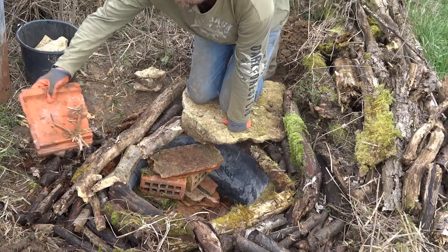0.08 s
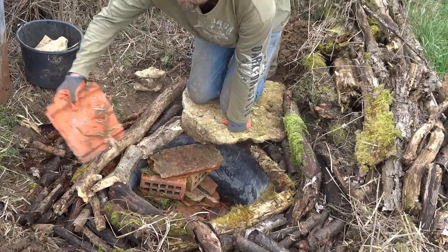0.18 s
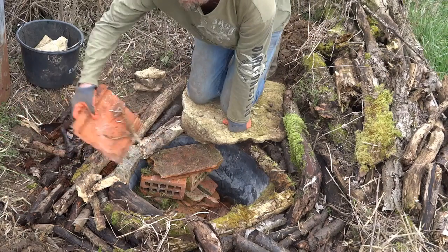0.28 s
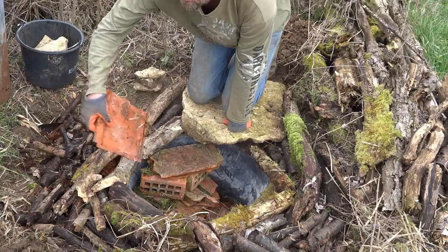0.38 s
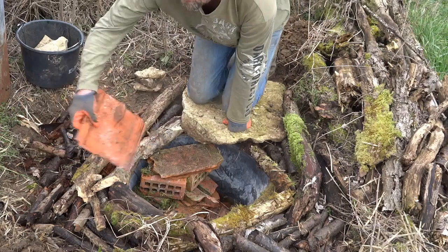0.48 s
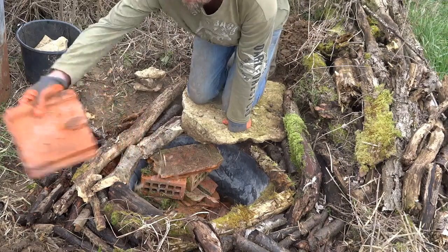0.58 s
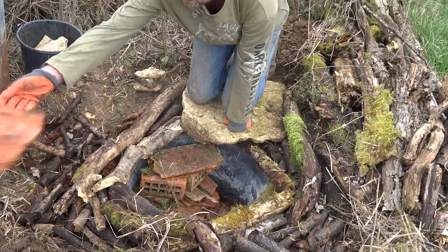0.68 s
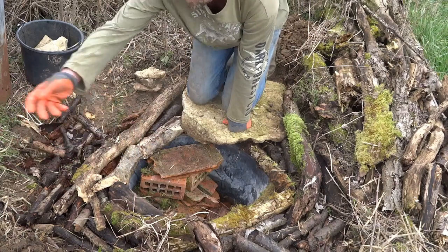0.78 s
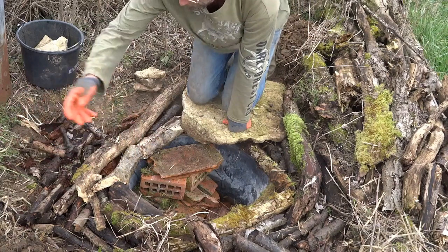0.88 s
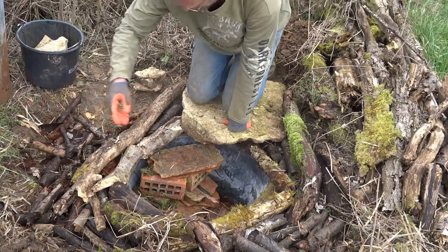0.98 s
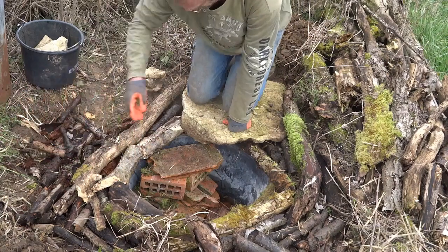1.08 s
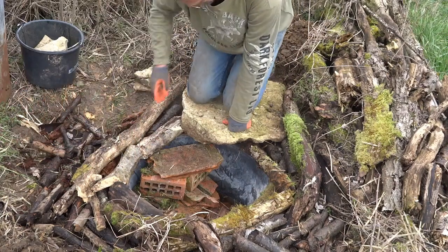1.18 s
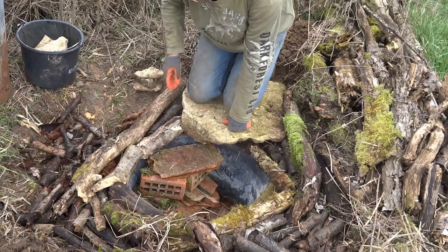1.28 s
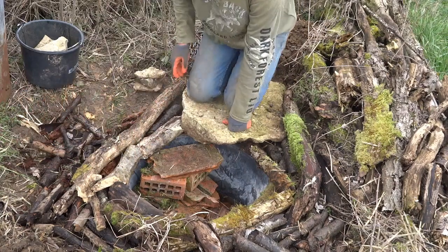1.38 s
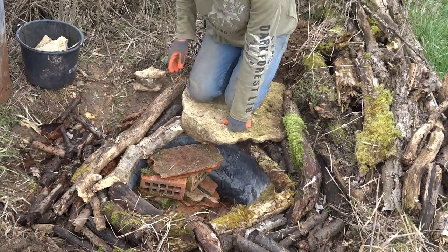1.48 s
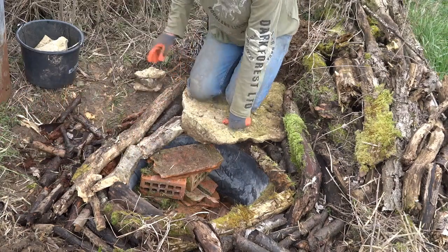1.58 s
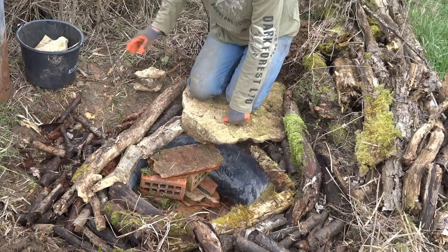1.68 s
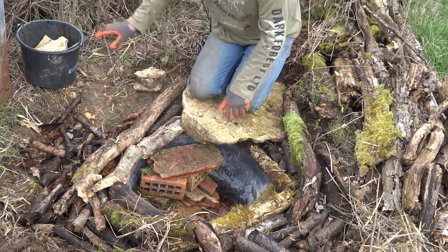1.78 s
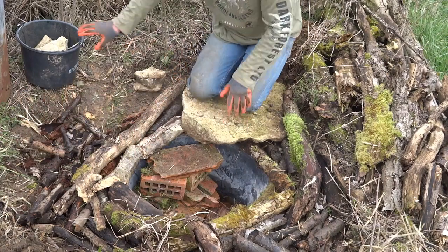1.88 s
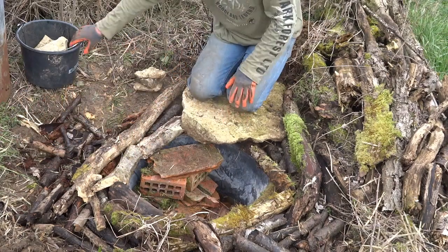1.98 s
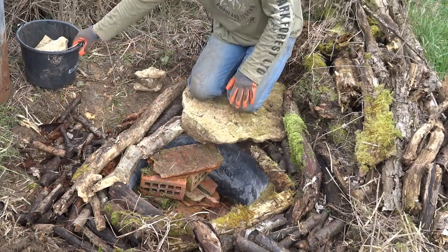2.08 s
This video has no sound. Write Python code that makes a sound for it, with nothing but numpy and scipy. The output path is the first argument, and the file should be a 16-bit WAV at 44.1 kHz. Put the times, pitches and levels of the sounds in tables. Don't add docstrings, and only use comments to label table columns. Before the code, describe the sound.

Clay tile knocks sharply on rubble, then cloth rustle and one smaller shard clink in a garden

```python
import sys
import numpy as np
from scipy import signal
from scipy.fft import rfft, irfft
from scipy.io import wavfile
from scipy.ndimage import uniform_filter1d

SR = 44100
rng = np.random.default_rng(int(sys.argv[2]) if len(sys.argv) > 2 else 0)


def ratio(d):
    e = np.asarray(d, float) / 20
    return 10 ** e


def wrap_up_sound(samples):
    columns = np.atleast_2d(samples).T
    tamed = np.clip(columns, -1, 1)
    steps = np.round(tamed * 32767).astype(np.int16)
    wavfile.write(sys.argv[1], SR, steps)


N = 92610
T = np.arange(N) / SR

# start in seconds, peak in dB, favoured frequency in Hz.
TILE_KNOCKS = [(.205, -39.5, 910), (.215, -37.5, 1100), (.222, -31, 1020), (.229, -36, 900),
               (.2355, -11, 1190), (.241, -12.5, 1900), (.2445, -8, 1100), (.2495, -17, 1270),
               (.253, -17, 1100), (.262, -11.5, 1180), (.272, -13, 1500), (.278, -16.5, 1050),
               (.286, -15, 1500), (.291, -19.5, 1420), (.297, -19, 990), (.307, -26, 800),
               (.3175, -17, 1250), (.322, -12.5, 1720), (.3262, -17, 864), (.334, -20.5, 1000),
               (.339, -15.5, 1260), (.351, -25.5, 1500), (.3665, -20, 960), (.375, -27, 780),
               (.386, -29, 1910), (.3935, -19, 850), (.400, -31, 670), (.407, -29, 910), (.412, -25.5, 680)]
# frequency in Hz, level in dB, t60 in seconds.
TILE_MODES = [(324.5, -0.5, 0.16), (587, -1, .07), (718, -12.5, 0.11), (846, -6, .05), (932, -1.5, 0.058),
              (1100, 2.5, 0.02), (1280.5, -5.5, 0.066), (1411, -4, 0.037), (1780, -6, .04),
              (2320, -5, 0.031), (2620, -10, 0.012), (3050, -13.5, 0.037), (3870, -16, .025)]
# frequency in Hz, density in dB per Hz.
TILE_GRIT = [(150, -24), (350, -6.5), (950, -10.5), (2800, -14), (3700, -28), (6000, -47.5)]
# start in seconds, peak in dB, favoured frequency in Hz.
SHARD_KNOCKS = [
    (1.058, -35.5, 520),
    (1.0635, -28, 3050),
    (1.0695, -18.5, 1560),
    (1.073, -15.5, 1290),
    (1.079, -21, 1260),
    (1.0845, -23.5, 760),
    (1.086, -33.5, 2700),
    (1.166, -52, 760),
    (1.19, -43, 1300),
]
# frequency in Hz, level in dB, t60 in seconds.
SHARD_MODES = [(322, -8.5, 0.064), (550, -8.5, 0.032), (759, -7, 0.096), (916, -4, .035), (1261, 3, 0.042),
               (1500, -7, 0.027), (1794, -7.5, 0.034), (2020, -1.5, 0.027), (757, -21.5, 0.33),
               (2700, -7.5, 0.054), (3030, -7, 0.048)]
# frequency in Hz, density in dB per Hz.
SHARD_GRIT = [(200, -23), (1270, 4), (3000, -19), (3600, -9), (7500, -37.5), (11000, -10.5)]
# start in seconds, peak in dB, centre in Hz, t60 in seconds.
TICKS = [(.071, -40.5, 935, .03), (.088, -46.5, 560, 0.037), (0.805, -48, 3270, 0.09),
         (.829, -48, 8400, 0.019), (0.249, -27.5, 6400, .012), (.271, -34, 5840, 0.0086),
         (0.291, -36, 5840, 0.0073), (.38, -45, 6200, 0.023), (1.08, -27.5, 10400, 0.004),
         (1.084, -47, 10800, 0.01), (1.08, -54, 4300, 0.02), (1.4615, -43.5, 560, 0.039),
         (2.022, -49, 2640, 0.31), (1.472, -37, 280, 0.02), (1.608, -49.5, 10550, .03),
         (1.7215, -37.5, 3220, .012), (1.7215, -37, 10100, 0.028), (1.7218, -40.5, 2270, 0.011),
         (1.7215, -46.5, 6740, 0.036), (1.778, -50, 2380, 0.18), (2.0975, -39.5, 500, 0.077),
         (2.086, -53, 950, 0.018)]
# start in seconds, length in seconds, first Hz, last Hz, level in dB.
BIRD_NOTES = [
    (.008, 0.0062, 3540, 4430, -47.5),
    (.013, 0.0088, 4330, 4310, -44),
    (0.024, 0.015, 3140, 3400, -46),
    (.04, .021, 3410, 4350, -57.5),
    (.058, 0.018, 4370, 4800, -51.5),
    (0.0752, .005, 4500, 3100, -47.5),
    (0.079, .018, 4930, 2840, -51.5),
    (.082, 0.011, 3780, 3820, -51.5),
    (1.84, 0.099, 4180, 4105, -73),
    (1.559, 0.035, 6360, 6350, -75),
]
# time in seconds, level in dB.
DOVE_LEVEL = [(.72, -69), (.85, -59), (1.0, -62), (1.3, -67), (1.42, -79)]
# time in seconds, level in dB.
RUSTLES = [
    [(.66, -65.5), (.704, -51), (.71, -41), (.757, -43.5), (.775, -57), (.8, -57), (.93, -67.5), (1.0, -73)],
    [(1.445, -89), (1.46, -57.5), (1.51, -65)],
    [(2.0, -72), (2.04, -60), (2.1, -58.5)],
]
# frequency in Hz, density in dB per Hz.
CLOTH_SPECTRUM = [(500, -19.5), (950, -5.5), (1300, -3.5), (2100, -6.5), (3000, -11.5), (5000, -24)]
# time in seconds, level in dB.
DUST_LEVEL = [(.195, -62), (.23, -41.5), (.25, -35), (.268, -53.5), (.415, -49.5), (.418, -67.5),
              (.65, -76), (.7, -51.5), (.76, -53), (.785, -70), (1.055, -71), (1.075, -46), (1.1, -58.5),
              (1.2, -72), (1.25, -69.5), (2.0, -72), (2.035, -61.5)]
# frequency in Hz, density in dB per Hz.
DUST_SPECTRUM = [(1800, -15.5), (3200, -2), (5000, -5.5), (6300, 2), (7800, -5.5), (10300, -2)]
# frequency in Hz, density in dB per Hz.
AIR_SPECTRUM = [(40, -40.5), (200, -27.5), (400, -8.5), (1350, -6), (3200, -9), (5000, -19.5),
                (6300, -17.5), (8000, -19.5), (11000, -21)]
# frequency in Hz, left-right correlation.
AIR_LIKENESS = [(60, 1), (830, 0.48), (11600, 0.93)]
# time in seconds, gain in dB.
AIR_SWELL = [(.41, 8.5), (.45, 0), (.7, 2.5), (.95, 3.5), (1.2, 3), (1.4, 0.5), (1.8, 2)]
# time in seconds, left over right in dB.
HANDS_PAN = [(.415, -3), (.43, 0.5), (1.0, 2), (1.06, 5), (1.3, 1)]


def evened(x):
    return x / np.sqrt(np.mean(x ** 2) + 1e-20)


def read(points, hz):
    f, value = np.transpose(points)
    return np.interp(np.log(hz + 1), np.log(f + 1), value)


def colour(x, points):
    gain = ratio(read(points, np.fft.rfftfreq(len(x), 1 / SR)))
    return evened(irfft(rfft(x) * gain, len(x)))


def envelope(rows, **ends):
    return ratio(np.interp(T, *np.transpose(rows), **ends))


def add(mix, start_s, sound):
    part = mix[..., round(start_s * SR):][..., :len(sound)]
    part += sound[:part.shape[-1]]


def sides(x, pan_db):
    return x * ratio(np.array([[.5], [-.5]]) * pan_db)


def widened(mid, side):
    return mid + np.array([[1], [-1]]) * side


def band(x, hz, width_hz):
    b, a = signal.iirpeak(min(hz, 20000), max(hz / width_hz, .3), SR)
    return signal.lfilter(b, a, x)


def low_cut(x):
    return signal.sosfilt(signal.butter(3, 161, "high", fs=SR, output="sos"), x)


def knocks(rows, modes, grit, grit_db, grit_t60_s):
    rise_s, spread_db, focus_db, detune = 0.00094, 2.2, 4.5, 0.0058
    out, t = np.zeros(N), np.arange(8192) / SR
    hz, db, t60_s = np.transpose(modes)[:, :, None]
    for start_s, peak_db, near_hz in rows:
        phase, level, pitch = rng.standard_normal((3, 14, 1))[:, :len(modes)]
        crunch = colour(rng.standard_normal(len(t)), grit)
        focus = focus_db * np.log2(hz / near_hz) ** 2
        size = ratio(db + spread_db * level - focus - 60 * t / t60_s)
        ring = (size * np.sin(2 * np.pi * hz * (1 + detune * pitch) * t + 2 * phase)).sum(0)
        hit = ring / abs(ring).max() + crunch * ratio(grit_db - 60 * t / grit_t60_s)
        add(out, start_s, ratio(peak_db) * np.minimum(t / rise_s, 1) * hit)
    return out


def tile():
    return low_cut(knocks(TILE_KNOCKS, TILE_MODES, TILE_GRIT, grit_db=-11, grit_t60_s=.04))


def shard():
    return low_cut(knocks(SHARD_KNOCKS, SHARD_MODES, SHARD_GRIT, grit_db=-12, grit_t60_s=0.051))


def ticks():
    out, t = np.zeros(N), np.arange(4096) / SR
    for start_s, peak_db, hz, t60_s in TICKS:
        width_hz = 246 + 0.28 * hz
        puff = rng.standard_normal(len(t)) * ratio(-60 * t / t60_s)
        puff = band(band(puff, hz, width_hz), hz, width_hz)
        add(out, start_s, ratio(peak_db) * puff / abs(puff).max())
    return low_cut(out)


def rustle():
    grains_per_s, grain_db, grain_cycles, pitches = 6000, 2.2, 12, 24
    size = ratio(grain_db * np.minimum(rng.exponential(1, N), 4))
    size = size * (rng.random(N) < grains_per_s / SR)
    kind, near = rng.integers(0, pitches, N), np.zeros(N)
    for k, hz in enumerate(np.geomspace(350, 5000, pitches)):
        cycle = np.arange(0, grain_cycles, hz / SR)
        grain = np.sin(np.pi * cycle / grain_cycles) ** 2 * np.sin(2 * np.pi * cycle)
        grain = grain * hz * ratio(read(CLOTH_SPECTRUM, hz))
        near += signal.oaconvolve(size * (kind == k), grain)[:N]
    near = evened(near) * sum(envelope(rows, left=-120, right=-120) for rows in RUSTLES)
    return widened(near, 0.16 * np.roll(near, 9))


def dust():
    mid, side = (colour(noise, DUST_SPECTRUM) for noise in rng.standard_normal((2, N)))
    return widened(mid, 0.56 * side) * envelope(DUST_LEVEL, left=-120)


def birds():
    pan_db, echo_db, echo_t60_s = 1, -7, 0.22
    out = np.zeros(N)
    for start_s, length_s, from_hz, to_hz, db in BIRD_NOTES:
        u = np.arange(0, length_s, 1 / SR) / length_s
        cycles = np.cumsum(from_hz + (to_hz - from_hz) * u) / SR
        add(out, start_s, ratio(db + 4) * np.sin(np.pi * u) ** 0.35 * np.sin(2 * np.pi * cycles))
    tail = rng.standard_normal((2, 16384)) * ratio(-60 * T[:16384] / echo_t60_s)
    echo = signal.fftconvolve(out[None], tail / np.linalg.norm(tail[0]), axes=1)[:, :N]
    return sides(out, pan_db) + ratio(echo_db) * echo


def dove():
    tone = rng.standard_normal(N)
    for _ in range(4):
        tone = band(tone, hz=353, width_hz=144)
    return evened(tone) * envelope(DOVE_LEVEL, left=-120, right=-120)


def air():
    air_db, patch_db = -63, 2.0
    frames, hz = N // 128 + 5, np.fft.rfftfreq(512, 1 / SR)
    a, b, c, d, patches = rng.standard_normal((frames, 257, 5)).T
    patches = evened(uniform_filter1d(uniform_filter1d(patches, 5, 0), 16, 1))
    same = np.clip(read(AIR_LIKENESS, hz), -1, 1)[:, None]
    left = a + 1j * b
    right = same * left + np.sqrt(1 - same ** 2) * (c + 1j * d)
    z = np.array([left, right]) * ratio(read(AIR_SPECTRUM, hz)[:, None] + patch_db * patches)
    noise = signal.istft(z, nperseg=512, noverlap=384)[1][:, :N]
    return evened(noise) * ratio(air_db) * envelope(AIR_SWELL)


def scene():
    cut_s, cut_db, fade_s = .4156, -24.5, 0.022
    pan_db = np.interp(T, *np.transpose(HANDS_PAN))
    mic = signal.firwin(255, 11020, window=("kaiser", 7), fs=SR)
    fade = ratio(cut_db) * np.clip(1 - (T - cut_s) / fade_s, 0, 1)
    cut = np.where(T < cut_s, 1, fade)
    clatter = cut * signal.oaconvolve(tile(), mic, "same")
    hands = sides(shard() + ticks() + rustle() + dust(), pan_db)
    mix = hands + birds() + dove() + air()
    return signal.oaconvolve(mix, mic[None], "same") + sides(clatter, pan_db)


def band_limit(x):
    return signal.sosfilt(signal.butter(12, 12160, fs=SR, output="sos"), x)


def record(dry):
    return band_limit(dry)


dry = scene()
out = record(dry)
wrap_up_sound(out)
```